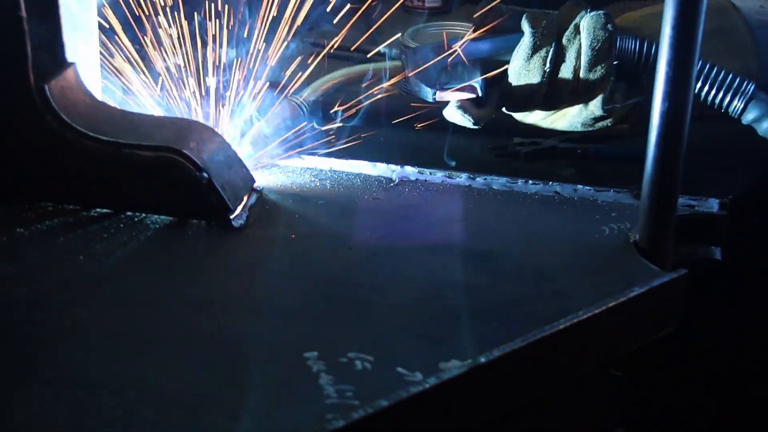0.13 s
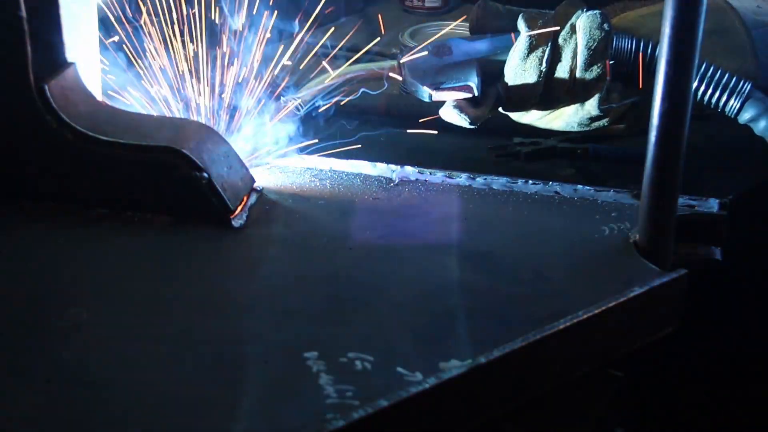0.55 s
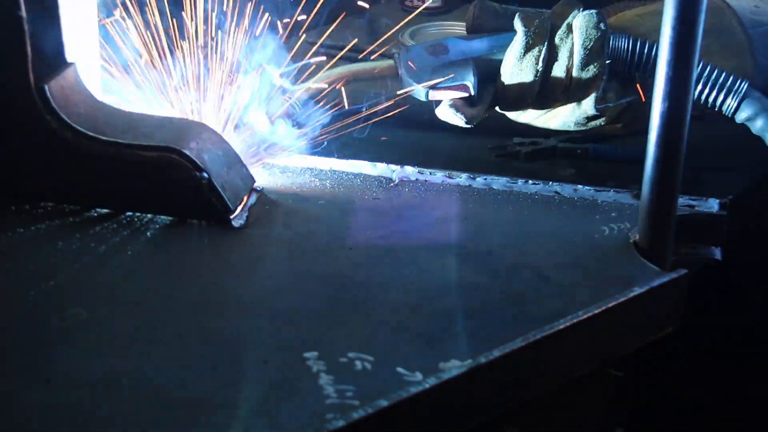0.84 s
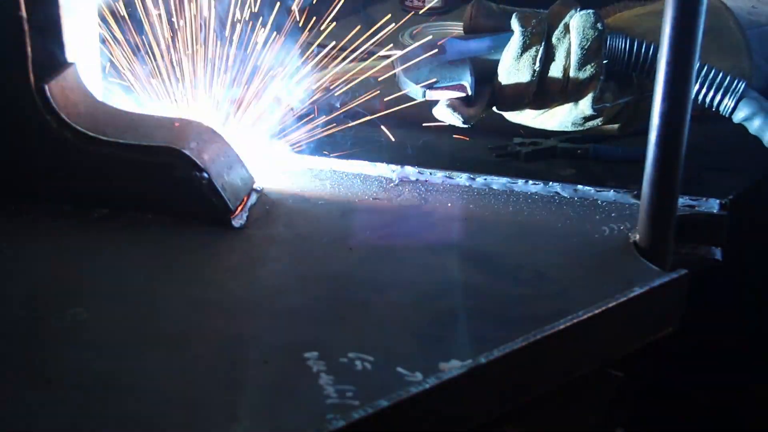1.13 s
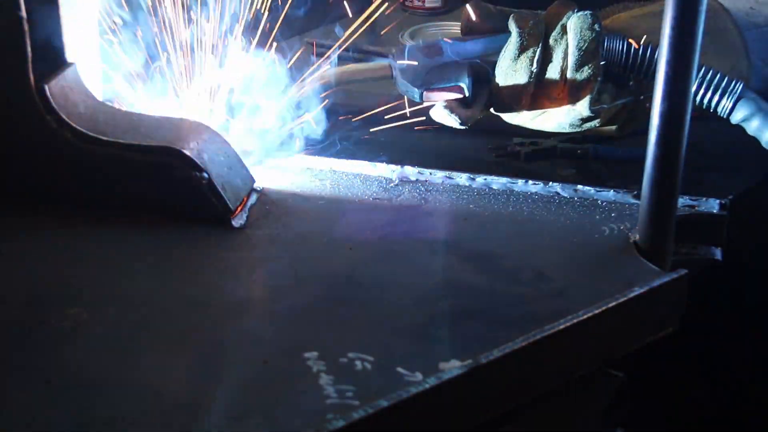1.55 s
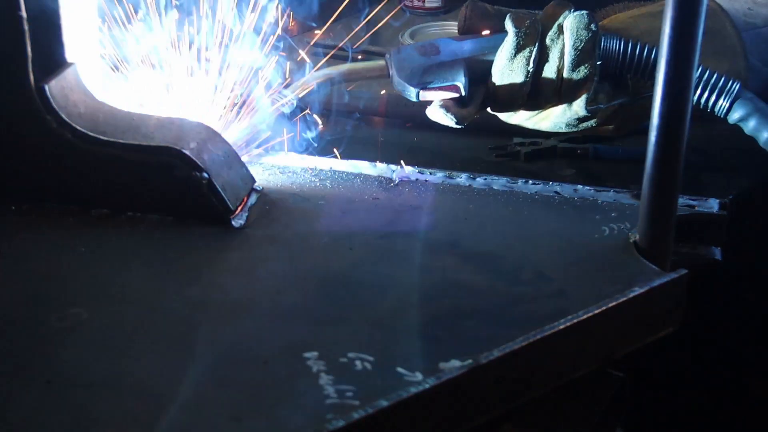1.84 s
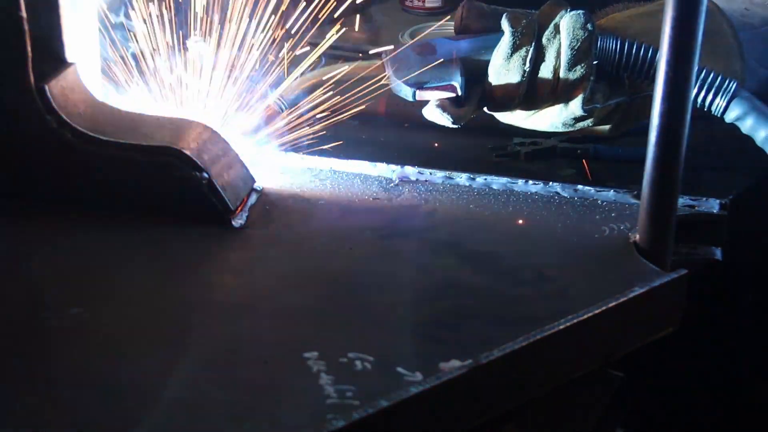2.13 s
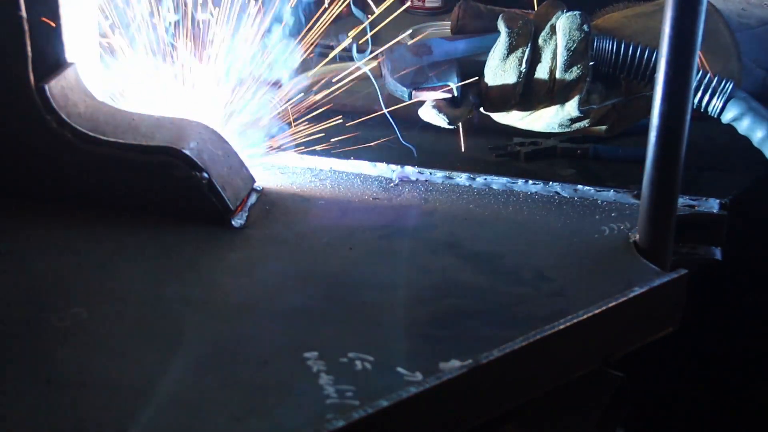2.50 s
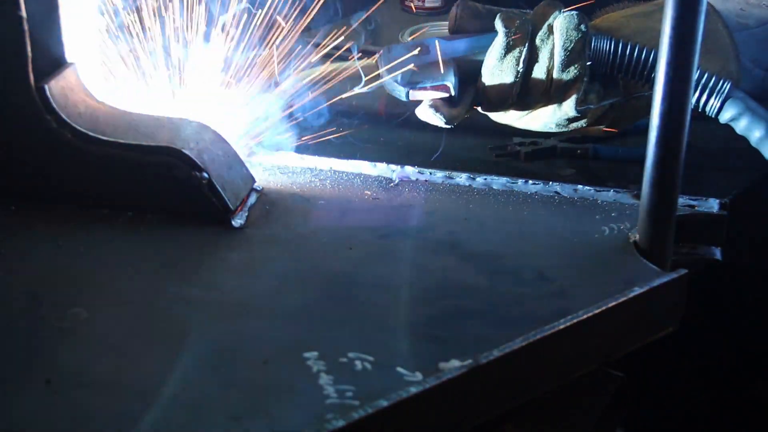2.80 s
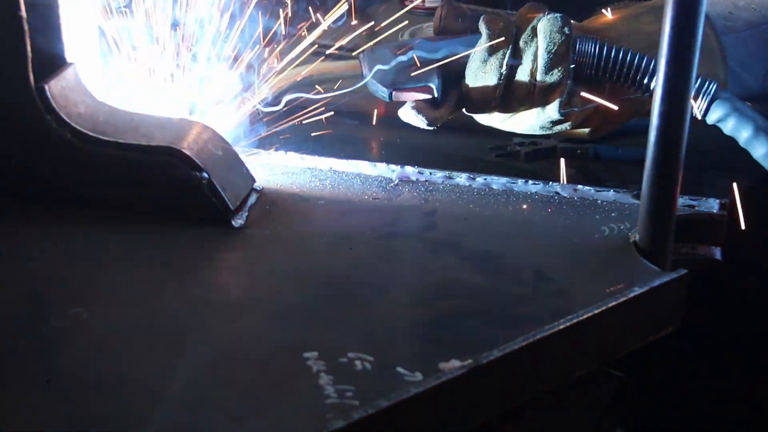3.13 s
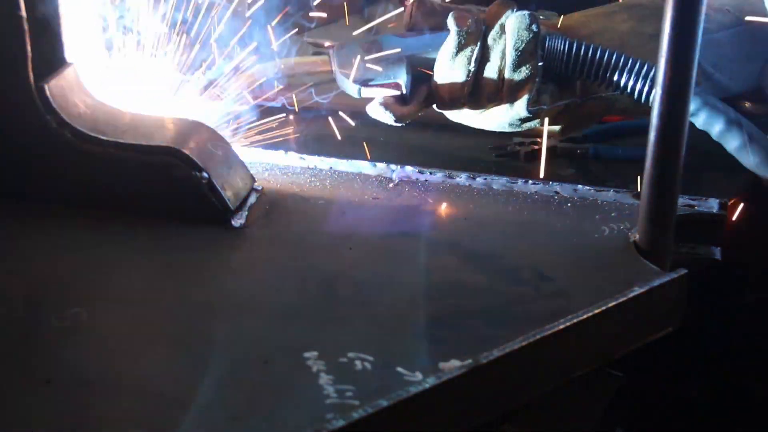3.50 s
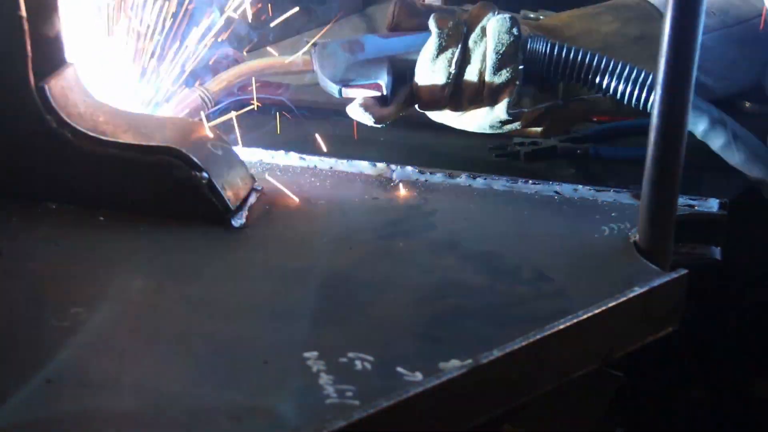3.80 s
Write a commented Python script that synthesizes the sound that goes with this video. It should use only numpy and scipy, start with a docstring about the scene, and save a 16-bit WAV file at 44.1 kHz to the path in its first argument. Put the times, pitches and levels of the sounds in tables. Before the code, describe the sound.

Faint arc welding: rapid irregular snaps over fine sizzle, steel ringing lightly, almost inaudible low hum. Just before three seconds it leaps to a much louder even hiss and stays there. Mono, small workshop reflections, short room tail.

```python
"""A welding arc crackles on a steel workpiece in a workshop; just before 3 s it jumps to a loud, even hiss.
Random clicks make the crackle: each short circuit of the wire ends in a snap, over a sizzle of tiny spits.
Gliding echoes from nearby steel faces sweep the comb colour as the torch moves; bench and room blur the snaps.
The workpiece rings along through narrow filters, and a faint, wavering sine is the hum of the power source.
At set moments sound processing smears everything, hum included, into a few brief tones."""
import sys
import numpy as np
from scipy import signal
from scipy.fft import rfft, irfft
from scipy.io import wavfile
from scipy.ndimage import uniform_filter1d, minimum_filter1d, map_coordinates

SR = 44100
rng = np.random.default_rng(int(sys.argv[2]) if len(sys.argv) > 2 else 0)


def master(y):
    """Save y as 16-bit WAV."""
    cut = np.clip(np.atleast_2d(y).T, -1, 1)
    pcm = np.round(cut * 32767)  # scale
    wavfile.write(sys.argv[1], SR, pcm.astype(np.int16))


N = 174195


# level of the faint arc in three bands: (time [s], bass [dB], middle [dB], treble [dB])
FAINT_LEVELS = [(0, -52, -41, -40), (0.06, -58.5, -44.5, -47.5), (0.11, -59.5, -51.5, -48.5),
                (0.135, -60, -48, -45.5), (0.17, -54.5, -43.5, -45.5), (0.27, -55, -44.5, -45),
                (0.31, -58.5, -48.5, -48.5), (0.37, -59, -50.5, -50), (0.405, -63, -53.5, -48),
                (0.43, -53.5, -43.5, -45), (0.58, -56, -45, -45.5), (0.7, -53, -44.5, -46.5),
                (0.79, -52.5, -43, -45), (0.825, -47, -43, -46), (0.85, -60, -51, -46.5),
                (0.94, -58.5, -52.5, -45.5), (1.01, -56.5, -44, -45.5), (1.07, -57, -43.5, -46.5),
                (1.2, -52.0, -44.5, -45.5), (1.47, -51.0, -42, -46.5), (1.66, -49.0, -42.5, -45.5),
                (1.85, -54.5, -43, -46.5), (2.05, -61.5, -48.5, -45), (2.11, -62, -45.5, -47),
                (2.2, -49.5, -42.5, -46), (2.38, -55.5, -45, -47), (2.68, -51, -42, -44.5),
                (2.905, -60.5, -46, -46)]
# tone colour of the faint arc, where only the shape counts: (frequency [Hz], level [dB])
FAINT_TONE = [(30, -35), (70, -22.5), (170, -20), (310, -11), (400, -16), (480, -8.5), (570, -9), (720, -4),
              (950, -7.5), (1140, -4), (1300, -10), (1520, -2.5), (1780, -9), (2050, -7.5), (2550, -4.5),
              (2950, -4.5), (3300, -2.5), (3900, -1), (4200, -7), (4750, 0), (5400, -3), (7100, -9),
              (8800, -11), (10000, -10), (15500, -12.5)]
FAINT_SHORTS_PER_S, FAINT_SIZZLE_DB, FAINT_RING_DB = 130, -0.5, -3.5  # sizzle is relative to the snaps


def faint_arc():
    """The arc before the jump: fewer short circuits, less sizzle and more ringing steel."""
    return arc(FAINT_TONE, FAINT_LEVELS, FAINT_SHORTS_PER_S, FAINT_SIZZLE_DB, FAINT_RING_DB)


# level of the loud arc in three bands, before the bright edge: (time [s], bass [dB], middle [dB], treble [dB])
LOUD_LEVELS = [(2.92, -39.5, -28, -28), (2.98, -33, -25, -29), (3.07, -36.5, -27, -30.5),
               (3.19, -34, -24, -29), (3.24, -36.5, -27, -32.5), (3.355, -31, -24.5, -29),
               (3.385, -41, -27, -27.5), (3.411, -33, -26, -29), (3.579, -36, -27.5, -30),
               (3.7, -33, -25.5, -27), (3.9, -37, -30.5, -27.5), (3.945, -32.5, -31, -28)]
# tone colour of the loud arc, where only the shape counts: (frequency [Hz], level [dB])
LOUD_TONE = [(30, -39), (70, -20), (170, -19.5), (310, -13), (400, -14.5), (480, -8), (570, -9), (720, -4),
             (950, -6), (1140, -7.5), (1300, -15.5), (1520, -6), (1900, 0), (2160, -6.5), (2500, -1),
             (3000, -1), (3500, 3.5), (4100, -3), (4550, 0.5), (5500, -1), (7100, -4), (8800, -8),
             (10500, -7.5), (15500, -10)]
LOUD_SHORTS_PER_S, LOUD_SIZZLE_DB, LOUD_RING_DB = 190, 6, -18  # sizzle is relative to the snaps


def loud_arc():
    """The arc after the jump: more short circuits, and so much sizzle that it hisses evenly."""
    hiss = arc(LOUD_TONE, LOUD_LEVELS, LOUD_SHORTS_PER_S, LOUD_SIZZLE_DB, LOUD_RING_DB)
    return bright_edge(hiss)


BASS_EDGE_HZ, TREBLE_EDGE_HZ = 1500, 6300
SIZZLE_PER_BASS_DB = 1.5  # dB of extra sizzle per dB of extra bass: an arc that roars more sizzles more


def arc(tone, levels, shorts_per_s, sizzle_db, ring_db):
    """The crackle in the workshop, with bass, middle and treble each following its own level."""
    bass_level = curve(levels)
    mean_bass = np.array(levels)[:, 1].mean()
    sizzle = sizzle_db + SIZZLE_PER_BASS_DB * (bass_level - mean_bass)
    source = crackle(shorts_per_s, sizzle) / np.hypot(1, undb(sizzle))
    coloured = convolve(ring(workshop(source), ring_db), click_of(tone))

    spectrum = rfft(coloured, 2 * N)
    f = np.arange(N + 1) * SR / (2 * N)
    below_bass_edge = 1 / (1 + (f / BASS_EDGE_HZ) ** 10)
    below_treble_edge = 1 / (1 + (f / TREBLE_EDGE_HZ) ** 10)
    bands = [below_bass_edge, below_treble_edge - below_bass_edge, 1 - below_treble_edge]
    out = np.zeros(N)
    for column, band in enumerate(bands, start=1):
        out += unit(irfft(spectrum * band)[:N]) * undb(curve(levels, axis=column))
    return out


SHORT_SPREAD, SNAP_SPREAD_DB = 0.5, 3.5  # spread of the waits is in natural-log units
SPITS_PER_S, SPIT_SPREAD_DB = 2500, 7


def crackle(shorts_per_s, sizzle_db, count=2000):
    """A snap ends each irregular short circuit, larger after a longer wait; boiling metal spits in between."""
    wait_luck, size_luck = rng.standard_normal((count, 2)).T
    waits = np.exp(SHORT_SPREAD * wait_luck - SHORT_SPREAD ** 2 / 2)  # 1 on average
    times = np.cumsum(waits) / shorts_per_s
    sizes = np.sqrt(np.minimum(waits, 1.3)) * undb(SNAP_SPREAD_DB * np.minimum(size_luck, 1))
    snaps = spikes(times, sizes)

    is_spit = rng.random(N) < SPITS_PER_S / SR
    spits = is_spit * undb(SPIT_SPREAD_DB * np.minimum(rng.standard_normal(N), 2))
    sizzle = unit((spits - spits.mean()) * hush(times))
    burn = unit(snaps - snaps.mean()) - undb(sizzle_db) * sizzle
    return burn * hush(np.array(HARD_SNAPS)[:, 0])


SHORT_S, SHORT_DB = 0.0025, -12  # length of a short circuit, and gain during it


def hush(times):
    """Gain that drops before each snap, because the arc dims while the wire is shorted."""
    t = np.arange(N) / SR
    ends = np.append(np.sort(times), np.inf)
    time_to_snap = ends[np.searchsorted(ends, t)] - t
    return np.where(time_to_snap < SHORT_S, undb(SHORT_DB), 1)


# snaps that stand out of the crackle, sized before tone, ringing and echoes: (time [s], level [dB])
HARD_SNAPS = [(0.0101, -28), (0.026, -24), (0.0342, -30), (0.1409, -26), (0.2263, -21), (0.233, -21.5),
              (0.2408, -24), (0.2538, -33), (0.2676, -20), (0.3177, -24.5), (0.3252, -21), (0.3598, -27),
              (0.3672, -20), (0.3757, -27), (0.421, -28), (0.4296, -34), (0.4428, -26), (0.4855, -22.5),
              (0.5705, -22), (0.6498, -32), (0.7531, -26.5), (0.8119, -22), (0.817, -19.5), (0.8254, -28),
              (0.8327, -25), (0.8593, -23.5), (0.8703, -27), (0.8805, -29), (0.8906, -30), (0.9036, -27),
              (0.9152, -29), (0.9348, -25), (0.954, -21.5), (0.9604, -25), (1.0024, -22.5), (1.0429, -28),
              (1.0651, -31), (1.1105, -21), (1.1874, -22), (1.2274, -21), (1.4689, -18), (1.5964, -25),
              (1.638, -19.5), (1.676, -19), (1.738, -23), (1.8112, -29), (1.8667, -23), (1.8806, -32),
              (1.902, -25), (1.9614, -21.5), (1.9958, -22), (2.0044, -25), (2.0197, -28), (2.0629, -28),
              (2.0822, -30), (2.0905, -31), (2.0973, -25), (2.18, -26), (2.3476, -21.5), (2.3907, -19),
              (2.4948, -21.5), (2.665, -19.5), (2.7393, -16.5), (2.8782, -19), (2.918, -9.5), (3.0517, -9),
              (3.2583, -10), (3.883, -9), (3.9156, -7.5), (3.9345, -7.5)]


def hard_snaps():
    """Single violent breaks of the molten bridge between wire and steel."""
    times, db = np.array(HARD_SNAPS).T
    clicks = spikes(times, undb(db))
    return convolve(ring(workshop(clicks), FAINT_RING_DB), click_of(FAINT_TONE))


# tones at which the workpiece rings, before the overall ring level: (frequency [Hz], width [Hz], level [dB])
WORKPIECE_TONES = [(2000, 84, 4.5), (2268, 50, -3), (2547, 103, 2.5), (2820, 30, 1.5), (3278, 100, 2),
                   (3550, 85, -5), (3770, 190, -5.5), (3970, 40, 4), (4280, 130, 5.5), (4493, 93, 1.5),
                   (5180, 19, 4), (5524, 42, -5.5), (7360, 95, 1)]


def ring(x, ring_db):
    """The workpiece rings along: each tone is a narrow filter struck by the sound."""
    ringing = np.zeros(N)
    for hz, width, db in WORKPIECE_TONES:
        b, a = signal.iirpeak(hz, hz / width, SR)
        ringing += undb(db) * signal.lfilter(b, a, x)
    return x + undb(ring_db) * ringing


# upper edge of the bright band in the loud hiss, which moves with the torch: (time [s], frequency [Hz])
EDGE_PATH = [(2.92, 5700), (3.15, 5660), (3.35, 6560), (3.6, 6850), (3.95, 6900)]
EDGE_DB, EDGE_WIDTH_HZ = 2, 840  # EDGE_DB scales the lift and dip, which peak at about 0.6 of it


def bright_edge(x, size=512):
    """A lift just below the moving edge and a dip just above it."""
    f, t, spectra = signal.stft(x, SR, nperseg=size)
    edge = np.interp(t, *np.array(EDGE_PATH).T)
    below = (edge - f[:, None]) / EDGE_WIDTH_HZ
    tilt = undb(EDGE_DB * below * np.exp(-below ** 2 / 2))
    return signal.istft(spectra * tilt, SR, nperseg=size)[1][:N]


# echoes from nearby steel faces, one list per path: (time [s], delay [ms], signed strength [gain])
ECHO_PATHS = [
    [(0, 0.81, -0.12), (1.3, 0.81, -0.24), (2.0, 0.69, -0.17), (2.5, 0.73, -0.34), (3.0, 0.71, -0.12),
     (3.25, 0.658, -0.13), (3.95, 0.51, -0.016)],
    [(0, 0.71, -0.27), (1.15, 0.63, -0.2), (1.6, 0.67, -0.15), (2.9, 0.52, -0.034), (3.25, 0.5, -0.073),
     (3.55, 0.421, -0.26), (3.95, .36, -0.13)],
    [(0, 0.59, .05), (1.3, 0.49, 0.12), (2.0, 0.5, 0.21), (2.95, 0.47, 0.055), (3.15, 0.38, 0.13),
     (3.95, 0.39, 0.054)],
    [(0, 0.34, 0.2), (1.5, 0.32, 0.24), (2.9, 0.29, 0.14), (3.3, 0.18, 0.078), (3.95, 0.2, 0.088)],
    [(0, 0.72, 0.16), (2.0, 1.07, 0), (2.4, 1.14, 0.06), (2.95, 1.105, 0.096), (3.25, 1.127, 0.021),
     (3.95, 1.068, 0.17)],
    [(0, 1.36, 0.13), (1.4, 1.23, 0.11), (2.2, 1.44, 0.17), (3.95, 1.3, 0.041)],
]
# how far the torch has moved: (time [s], place [scatter patterns passed])
TORCH_PATH = [(0, 0), (2.9, 4), (3.95, 9)]
BENCH_DB, BENCH_T60_S, BENCH_DELAY_S = -1, 0.049, 0.003  # T60 is the time to fade by 60 dB
STEEL_DB, STEEL_T60_S = -8.5, 0.0046  # scatter within the workpiece
ROOM_DB, ROOM_T60_S = -9.5, 0.45
SCATTER_FROM_HZ = 1310  # longer waves pass around the clutter


def workshop(x, count=10):
    """Direct sound, scatter that changes as the torch moves, gliding echoes off the steel, and the room."""
    near = x
    place = np.clip(curve(TORCH_PATH), 0, count - 1)
    for k in range(count):
        share = np.sqrt(np.maximum(1 - np.abs(place - k), 0))  # fades from one pattern to the next
        bench = undb(BENCH_DB) * scatter(BENCH_T60_S, BENCH_DELAY_S, SCATTER_FROM_HZ, size=8192, order=30)
        steel = undb(STEEL_DB) * scatter(STEEL_T60_S, 0.0004, SCATTER_FROM_HZ, size=8192, order=60)
        near = near + convolve(x * share, bench[:4096] + steel[:4096])

    t = np.arange(N) / SR
    echoes = np.zeros(N)
    for path in ECHO_PATHS:
        heard_from = (t - curve(path) / 1000) * SR  # earlier position in samples
        echoes += curve(path, axis=2) * map_coordinates(near, [heard_from], order=3)
    room = undb(ROOM_DB) * convolve(x, scatter(ROOM_T60_S, 0.012, from_hz=140, size=32768))
    return near + echoes + room


def scatter(t60, delay, from_hz, size=16384, order=160):
    """A fading cloud of reflections: even overall but finely ragged in spectrum, and weak in the bass."""
    t = np.arange(size) / SR
    f = np.arange(size // 2 + 1) * SR / size
    fading_noise = rng.standard_normal(size) * np.exp(-np.log(1000) * t / t60)
    spectrum = rfft(fading_noise)
    smooth = np.sqrt(uniform_filter1d(np.abs(spectrum) ** 2, order))
    bass_cut = 1j * f / (1j * f + from_hz)
    cloud = irfft(spectrum / smooth * bass_cut)
    return np.concatenate([np.zeros(int(delay * SR)), cloud[:size // 2]])


HUM_HZ, HUM_DB, HUM_WAVER_DB = 101.5, -77.5, 2.5


def hum(size=90):
    """The power source hums at about twice the mains frequency, wavering a little in level."""
    waver = unit(signal.resample(rng.standard_normal(size), N))
    tone = unit(np.sin(2 * np.pi * HUM_HZ * np.arange(N) / SR))
    return undb(HUM_DB + HUM_WAVER_DB * waver) * tone


# moments when sound processing smears everything into a few brief tones: time [s]
SMEAR_TIMES = [0.28, 0.511, 0.596, 1.152, 1.45, 1.704, 1.791, 2.137, 2.368, 2.476, 2.539, 2.776, 3.2, 3.41]
SMEAR_S, SMEAR_SHARPNESS = 0.02, 4  # a sharper smear keeps fewer tones
SMEAR_DB, SMEAR_TOP_HZ = -1.5, 9100  # level relative to the sound it replaces, and where it turns dull


def smear(x, size=2048, order=41):
    """Sound processing briefly replaces everything, hum included, with its own strongest tones."""
    out = x.copy()
    lag = np.arange(size) - size // 2
    mix = np.exp(-(lag / SR / (SMEAR_S / 2)) ** 4)
    f = np.arange(size // 2 + 1) * SR / size
    dull = 1 / np.hypot(1, (f / SMEAR_TOP_HZ) ** 2)
    for time in SMEAR_TIMES:
        at = int(time * SR) + lag
        spectrum = rfft(x[at] * np.hanning(size))
        strength = np.abs(spectrum) + 1e-12
        strongest_nearby = -minimum_filter1d(-strength, order)
        tones = irfft(spectrum * dull * (strength / strongest_nearby) ** SMEAR_SHARPNESS)
        tones *= np.sqrt(np.sum(mix * x[at] ** 2) / np.sum(mix * tones ** 2))  # match the sound replaced
        out[at] = np.sqrt(1 - mix) * out[at] + np.sqrt(mix) * undb(SMEAR_DB) * tones
    return out


def undb(db):
    """Turn decibels into gain."""
    return 10 ** (np.asarray(db) / 20)


def unit(x):
    """Scale to an rms (average strength) of 1."""
    return x / np.sqrt(np.mean(x ** 2))


def curve(rows, axis=1):
    """One column of a table, joined by straight lines in time."""
    rows = np.array(rows)
    return np.interp(np.arange(N) / SR, rows[:, 0], rows[:, axis])


def convolve(x, response):
    """Play a sound through a response."""
    return signal.oaconvolve(x, response)[:N]


def click_of(tone, size=4096):
    """The click with this spectrum that starts as sharply as it can (minimum phase), with peak 1."""
    hz, db = np.array(tone).T
    f = np.arange(size // 2 + 1) * SR / size
    gain = undb(np.interp(np.log(f + 1), np.log(hz), db))
    cepstrum = irfft(np.log(gain))
    cepstrum[1:size // 2] *= 2  # folding the second half onto the first leaves nothing before the start
    cepstrum[size // 2 + 1:] = 0
    click = irfft(np.exp(rfft(cepstrum)))
    return click / np.abs(click).max()


def spikes(times, sizes):
    """One-sample pressure drops of the given sizes at the given times."""
    at = np.clip(times * SR, 0, N).astype(int)
    return -np.bincount(at, sizes, N + 1)[:N]


JUMP_S, JUMP_RISE_S = 2.916, 0.0019


def scene():
    """The faint arc gives way abruptly to the loud one, with hard snaps and hum throughout."""
    jump = np.clip((np.arange(N) / SR - JUMP_S) / JUMP_RISE_S, 0, 1)
    burning = (1 - jump) * faint_arc() + jump * loud_arc()
    return smear(burning + hard_snaps() + hum())[None]


TOP_HZ = 15750


def record(dry):
    """A steep filter removes the highest treble."""
    low_pass = signal.firwin(601, TOP_HZ, fs=SR, window=("kaiser", 9))
    return signal.fftconvolve(dry, low_pass[None], mode="same")


dry = scene()
out = record(dry)
master(out)
```